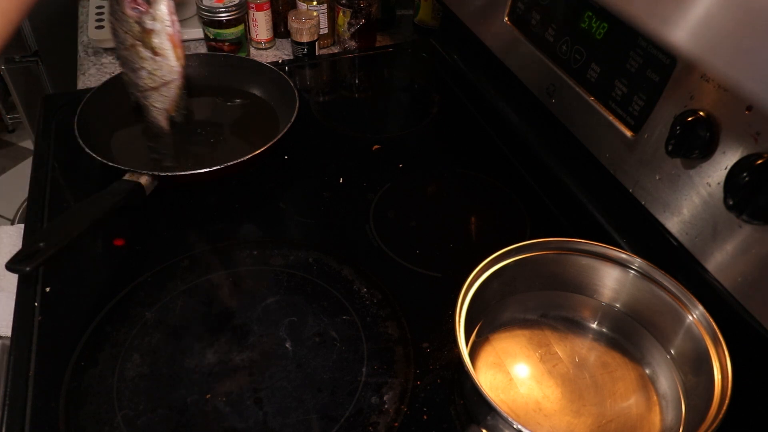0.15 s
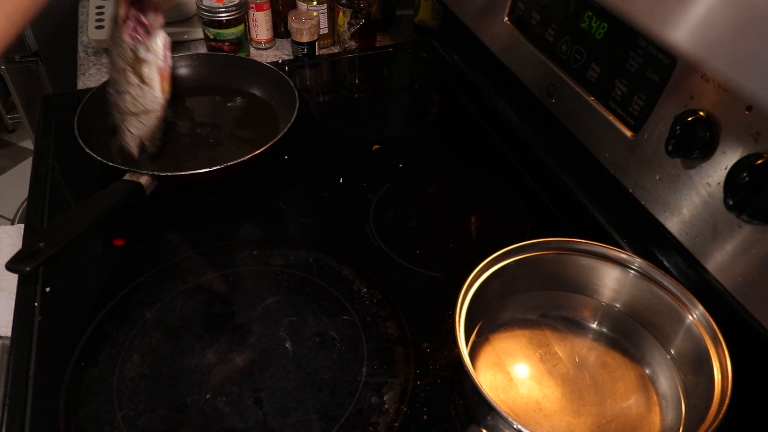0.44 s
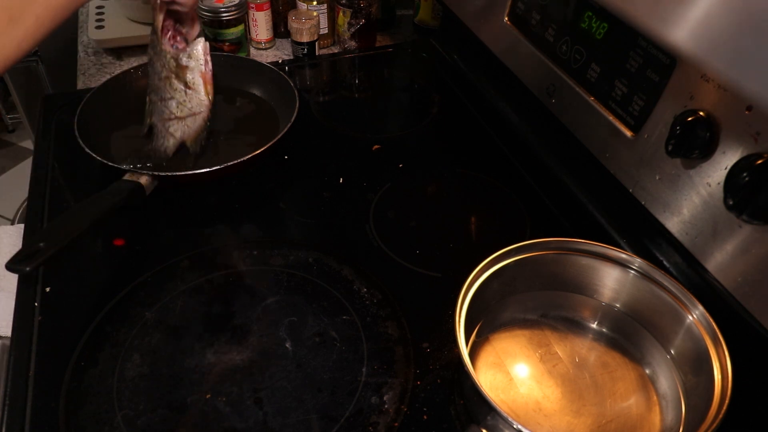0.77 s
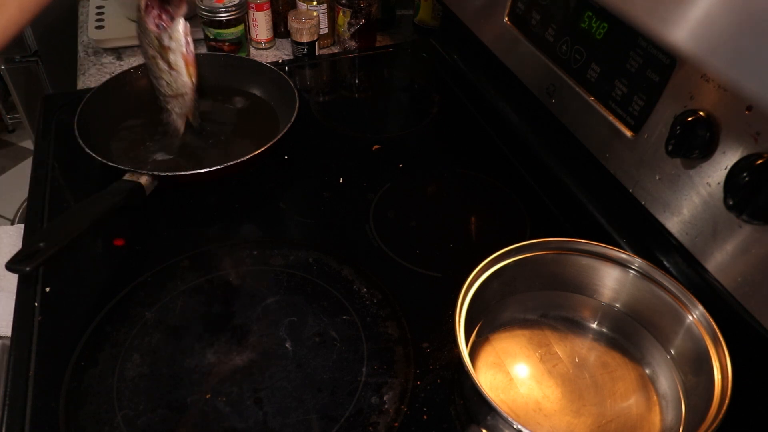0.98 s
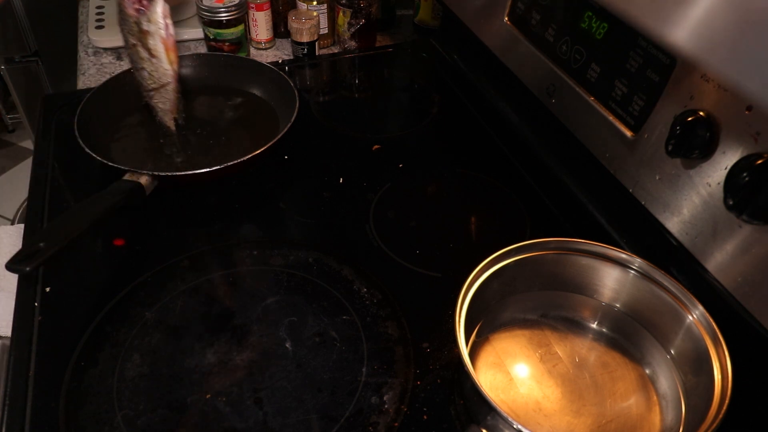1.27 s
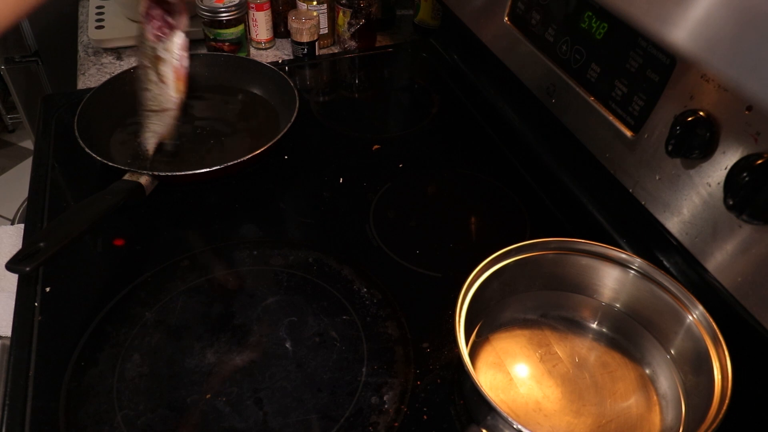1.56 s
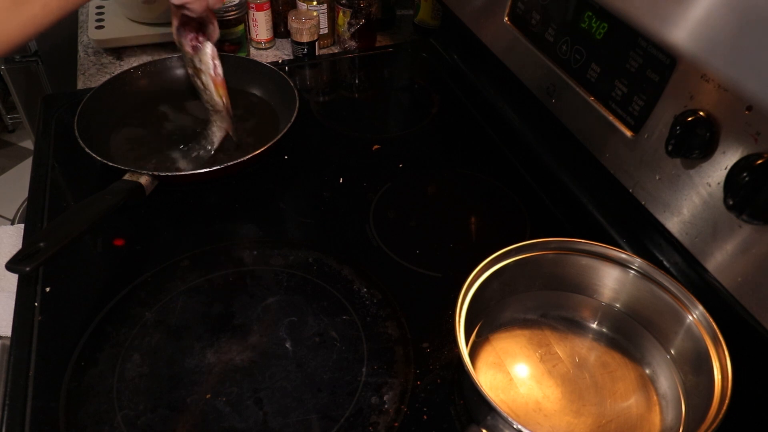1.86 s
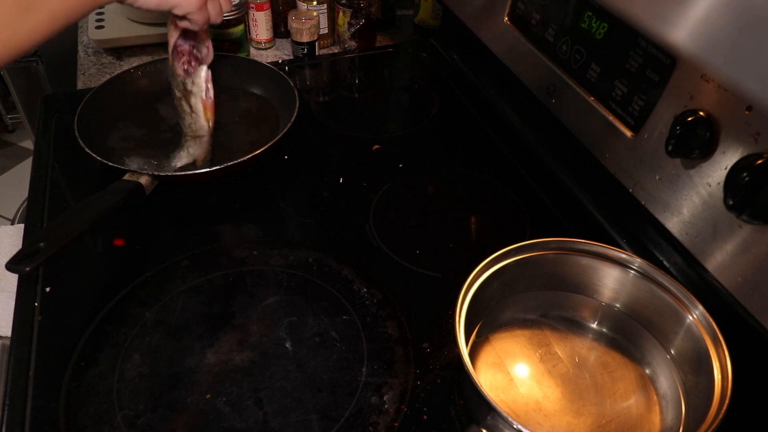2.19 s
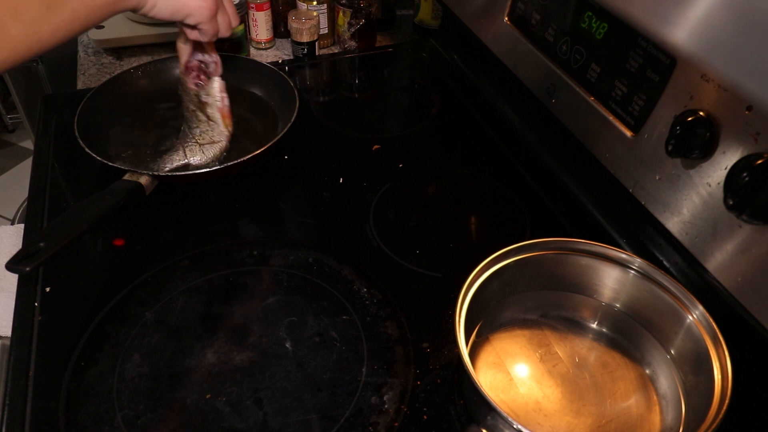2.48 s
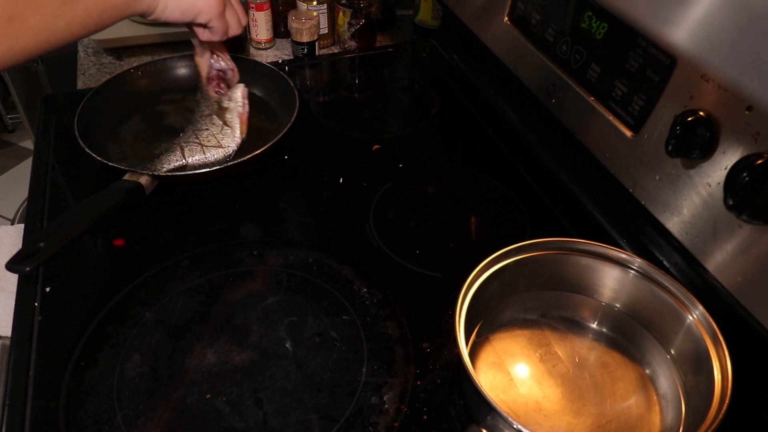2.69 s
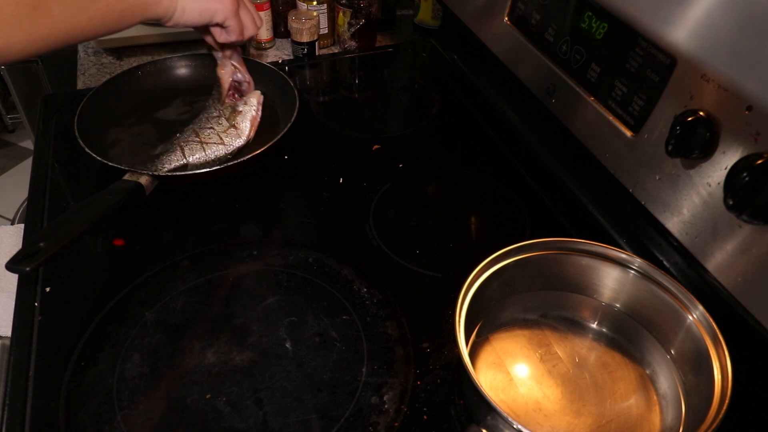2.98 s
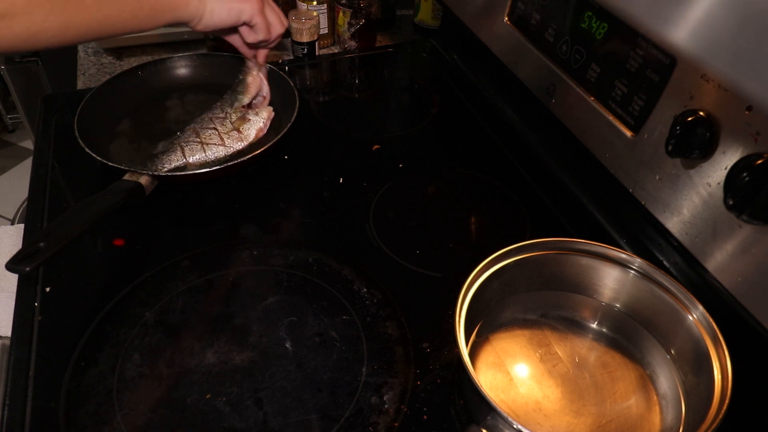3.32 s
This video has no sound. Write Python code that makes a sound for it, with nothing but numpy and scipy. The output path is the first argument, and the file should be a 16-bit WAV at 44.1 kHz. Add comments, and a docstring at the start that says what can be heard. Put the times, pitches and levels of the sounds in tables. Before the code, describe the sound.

Hot oil sizzles in short, popping bursts as a wet fish's tail touches a frying pan, with a thin squeal of steam. The sizzle then turns louder and steady, crackling and gurgling close by in a small kitchen.

```python
"""Wet fish into hot oil

A wet fish is dipped tail first into a pan of hot oil, lifted clear, then lowered in. Water flashes
to steam: a sizzle of tiny bursts, single loud pops, a thin squeal and a gurgle of larger bubbles.
The pan and the hob scatter the bursts into a small kitchen; the stove starts to hum."""
import sys
import numpy as np
from scipy import signal
from scipy.io import wavfile

SR = 44100
rng = np.random.default_rng(int(sys.argv[2]) if len(sys.argv) > 2 else 0)


def transcribe(u):
    """Save the signal u as a 16-bit wav file named by the first command-line argument.

    u: samples, shape (n,) or (channels, n), limited to [-1, 1]; the rate is SR.
    q: integer samples, one column per channel.
    """
    v = np.clip(np.atleast_2d(u).T, -1, 1)
    q = np.round(v * 32767).astype(np.int16)
    wavfile.write(sys.argv[1], SR, q)


N = 152145
TIME = np.arange(N) / SR
CUTOFF_HZ = 15900
EDGES_HZ = 16500 / 2 ** np.arange(9.5, -.1, -.5)
BANDS_HZ = np.sqrt(EDGES_HZ[1:] * EDGES_HZ[:-1])  # half an octave apart

# Sizzle envelope in five registers: time_s, low_db, low_mid_db, high_mid_db, treble_db, top_db
SIZZLE_LEVELS = [(0.0, -61, -45, -45, -50, -50.5), (0.12, -62, -65, -50, -46, -48),
                 (0.24, -72, -66.0, -55, -57, -51.5), (0.32, -67, -74, -71, -52, -61),
                 (0.47, -72, -80, -69, -58.5, -56.5), (0.55, -58, -58, -41, -45.5, -54),
                 (0.72, -53, -51, -41, -42.5, -46), (0.9, -63, -48, -37.5, -53.5, -48),
                 (1.06, -60, -53, -42.5, -43, -59), (1.17, -60.5, -38.5, -42.5, -41.5, -52),
                 (1.29, -61, -64, -48.5, -44.5, -54), (1.44, -65, -73, -53.5, -56.5, -67),
                 (1.58, -68, -78, -58, -59, -61), (1.74, -54, -44.5, -47.0, -54, -56),
                 (1.86, -59, -58, -41, -44.5, -55), (1.98, -46.5, -33.5, -37.5, -39.0, -51),
                 (2.22, -44.5, -43.5, -33.0, -37.0, -50.5), (2.42, -52, -40, -38, -39.5, -46),
                 (2.6, -49, -31.5, -37.5, -39.5, -44.5), (3.45, -44.5, -39, -38.5, -39.0, -49.0)]


def from_db(db):
    """Decibels to gain."""
    return 10 ** (np.asarray(db) / 20)


def unit_rms(x):
    """Scale to unit rms."""
    return x / np.sqrt(np.mean(x ** 2) + 1e-20)


def decay(t, t60_s):
    """An envelope that falls 60 dB in t60_s."""
    return np.exp(-np.log(1000) * t / t60_s)


def in_time(rows):
    """Breakpoints to one curve per column, sample by sample."""
    time_s, *columns = np.transpose(rows)
    return np.array([np.interp(TIME, time_s, column) for column in columns])


def at_hz(spectrum, hz):
    """Read a spectrum on a log-frequency axis."""
    points_hz, db = np.transpose(spectrum)
    return np.interp(np.log(hz), np.log(points_hz), db)


def band(x, hz, octaves):
    """Band-pass around a pitch; a click rings in it for a few cycles."""
    edges = np.minimum(hz * 2 ** (np.array([-.5, .5]) * octaves), [.44 * SR, .48 * SR])
    return signal.sosfilt(signal.butter(2, edges, "band", fs=SR, output="sos"), x + 1e-18)


def clicks(per_s, spread_db):
    """Random clicks, many small and a few large."""
    sizes = from_db(spread_db * np.minimum(rng.exponential(1, N), 4.5))
    return (rng.random(N) < per_s / SR) * sizes * rng.choice([-1, 1], N)


def scatter(x, t60_s=.034, spray_db=7):
    """Each click trails a quick spray of reflections around the pan, different for every spot."""
    feedback = from_db(-120 / (t60_s * SR))
    energy = signal.lfilter([1 - feedback], [1, -feedback], x ** 2 + 1e-30)
    return x + from_db(spray_db) * np.sqrt(energy) * rng.standard_normal(len(x))


def bubbles(births, pitch_hz, cycles):
    """Each click sets off a damped sine that falls 60 dB over the given cycles."""
    out, t = np.zeros(N + SR), TIME[:SR // 20]
    for i in np.flatnonzero(births):
        hz = pitch_hz[i]
        ring = np.sin(2 * np.pi * hz * t) * decay(t, cycles / hz)
        out[i:i + len(t)] += births[i] * np.sqrt(hz) * ring
    return unit_rms(out[:N])


def sizzle(hiss_db=-2.5, burst_octaves=.54):
    """Tiny steam bursts, each at a pitch of its own, over a hiss of countless smaller ones."""
    # Centres of the five registers: pitch_hz
    registers = [900, 1850, 3600, 6900, 12300]
    # Tone colour of the sizzle: pitch_hz, gain_db
    colour = [(200, -57), (360, -10.5), (520, -16.5), (750, -4.5), (1150, -4.5), (1700, -7), (2900, -2),
              (4000, -8.5), (6000, -1.5), (8700, -2), (10800, -21), (14000, -5)]
    levels_db = in_time(SIZZLE_LEVELS)
    bursts = clicks(per_s=1500, spread_db=4.4)
    burst_pitch = rng.uniform(np.log2(150), np.log2(30000), N)
    out = np.zeros(N)
    for hz in BANDS_HZ[6:]:
        in_band = np.exp(-.5 * ((burst_pitch - np.log2(hz)) / burst_octaves) ** 2)
        grains = unit_rms(scatter(bursts * in_band))
        hiss = from_db(hiss_db) * rng.standard_normal(N)
        crossfade = [np.interp(np.log(hz), np.log(registers), row) for row in np.eye(len(registers))]
        gain = from_db(crossfade @ levels_db + at_hz(colour, hz))
        out += gain * unit_rms(band(grains + hiss, hz, octaves=.73))
    return out


def spits():
    """Sparse, bright ticks of oil spray ride the top of the sizzle."""
    top_db = in_time(SIZZLE_LEVELS)[-1]
    spray = scatter(clicks(per_s=260, spread_db=4.5))
    return from_db(top_db - 2) * unit_rms(band(spray, hz=10600, octaves=.93))


def blips(centre_hz=3870, spread_octaves=.65):
    """Small bubbles ring briefly at scattered pitches, swelling with the sizzle's high mids."""
    high_mid_db = in_time(SIZZLE_LEVELS)[2]
    hz = np.minimum(centre_hz * 2 ** (spread_octaves * rng.standard_normal(N)), CUTOFF_HZ)
    return from_db(high_mid_db - 3) * bubbles(clicks(per_s=380, spread_db=4), hz, cycles=80)


def room_tone():
    """Quiet kitchen air: a steady bed of noise."""
    # Spectrum of the air: pitch_hz, band_level_db
    air = [(25, -90), (65, -75), (100, -78), (550, -68.5), (1600, -80), (15000, -68.5)]
    return sum(from_db(at_hz(air, hz)) * unit_rms(band(rng.standard_normal(N), hz, octaves=.35))
               for hz in BANDS_HZ)


def pan_ring():
    """The pan's modes dying away after one tap, with unit energy."""
    # Modes of the pan: pitch_hz
    modes = [620, 1061, 1181, 1490, 2420, 2880, 3620, 5690]
    t = TIME[:SR // 2]
    ring = sum(np.cos(2 * np.pi * hz * t) for hz in modes) * decay(t, t60_s=.073)
    return ring / np.linalg.norm(ring)


def kitchen(x, pan_db=-23.5, room_db=-9, onset_s=.0084):
    """Direct sound, the faint ring of the pan and the small room's tail."""
    t = TIME[:SR // 2]
    tail = rng.standard_normal(len(t)) * decay(t, t60_s=.26) * (1 - np.exp(-t / onset_s))
    tail /= np.linalg.norm(tail)
    response = signal.unit_impulse(len(t)) + from_db(pan_db) * pan_ring() + from_db(room_db) * tail
    return signal.fftconvolve(x, response / np.linalg.norm(response))[:N]


def pops(snap_db=-20, splat_hz=456, pan_db=-20.5):
    """Water drops explode and set the pan ringing: a short note, a faint snap and a wet splat."""
    # Exploding drops: start_s, level_db, pitch_hz, width_octaves
    drops = [(0.0765, -38.5, 3700, 1.7), (0.0939, -37, 3760, 1.85), (0.1385, -34, 7300, 0.9),
             (0.5188, -39, 8600, 0.36), (0.5785, -35, 2640, 1.1), (0.6352, -33.5, 3050, 2),
             (0.6683, -33.5, 3240, 1.4), (0.7427, -32, 2300, 2.55), (0.7621, -34, 3500, 1.3),
             (0.8085, -36.5, 1720, 2), (0.8525, -31, 1570, 2), (0.8973, -33.5, 3350, 0.55),
             (1.09, -30, 3170, 0.25), (1.198, -24.5, 4450, 1.07), (1.3466, -28, 2690, 0.35),
             (1.347, -32.5, 3670, 0.17), (1.3478, -27, 6500, 0.42), (1.6279, -34, 2700, 0.58),
             (1.6848, -32, 1880, 1.96), (1.7757, -34, 3700, 1.05), (1.8326, -40, 2650, 0.47),
             (1.9039, -30, 2820, 0.9), (1.9225, -27, 2220, 0.67), (1.9511, -29, 1790, 2.3),
             (1.9616, -25, 2080, 1.07), (2.0028, -27.5, 2640, 2.3), (2.0308, -26.5, 1670, 2.1),
             (2.099, -24, 2200, 2.9), (2.1107, -28, 1750, 1.5), (2.209, -28, 960, 0.62),
             (2.2283, -26.5, 2870, 1.55), (2.2585, -23.5, 4000, 0.46), (2.2947, -29.5, 2380, 0.4),
             (2.355, -34, 2940, 0.64), (2.424, -33.5, 3000, 0.62), (2.5809, -27.5, 2500, 0.9),
             (2.6268, -28, 4050, 0.81), (2.6722, -23, 2370, 2.1), (2.817, -24.5, 4800, 0.73),
             (2.942, -36.5, 2880, 0.31), (2.9872, -20.5, 1560, 1.2), (3.0938, -26, 5000, 0.82),
             (3.19, -27.5, 3200, 0.51), (3.3388, -19, 1910, 0.85), (3.3555, -23.5, 2000, 0.93)]
    snap_filter = signal.butter(1, [splat_hz, 9950], "band", fs=SR, output="sos")
    out = np.zeros(N + SR)
    for start_s, level_db, hz, octaves in drops:
        click = scatter(signal.unit_impulse(SR // 20))
        note = unit_rms(band(click, hz, octaves))
        snap = from_db(snap_db) * unit_rms(signal.sosfilt(snap_filter, click))
        octaves_above_splat = np.log2(hz / splat_hz) - octaves / 2
        splat_db = -7.5 - 13.5 * octaves_above_splat  # deep, wide pops are the wettest
        splat = from_db(splat_db) * unit_rms(band(click, splat_hz, octaves=.65))
        gain = from_db(level_db) * np.sqrt(.009 * SR / len(click))  # the energy of 9 ms at level_db
        start = int(start_s * SR)
        out[start:start + len(click)] += gain * (note + snap + splat)
    return out[:N] + from_db(pan_db) * signal.fftconvolve(out, pan_ring())[:N]


def squeal():
    """Steam squeezes out from under the tail in a sputtering jet that sinks in pitch."""
    # Glide of the jet: time_s, level_db, pitch_hz
    jet = [(.12, -78, 8930), (.16, -47, 8860), (.25, -43, 6330), (.31, -53, 6230), (.46, -54, 5900),
           (.49, -55, 3225), (.6, -71, 2418)]
    level_db, hz = in_time(jet)
    sputter = scatter(clicks(per_s=200, spread_db=3))
    whistle = signal.hilbert(band(sputter, hz.max(), octaves=.3))
    shift_down = np.exp(2j * np.pi * np.cumsum(hz - hz.max()) / SR)
    return from_db(level_db) * unit_rms(np.real(whistle * shift_down))


def gurgle(spread_octaves=.19, low_cut_hz=500):
    """Larger bubbles ring deeper as more of the fish sinks in."""
    # Bubbling under the fish: time_s, level_db, pitch_hz
    bubbling = [(.5, -88, 2900), (.58, -43, 2290), (.78, -54.5, 1310), (.87, -47, 1130),
                (1.01, -42.5, 1205), (1.25, -88, 2000), (1.87, -66, 2330), (1.96, -49, 1760),
                (2.11, -33.5, 1120), (2.21, -35.5, 1000), (2.32, -43.5, 880), (2.55, -48.5, 1450),
                (3.32, -42, 1480), (3.35, -31, 1560), (3.45, -32, 1400)]
    level_db, centre_hz = in_time(bubbling)
    hz = centre_hz * 2 ** (spread_octaves * rng.standard_normal(N))
    rings = bubbles(clicks(per_s=360, spread_db=3), hz, cycles=33)
    low_cut = signal.butter(2, low_cut_hz, "high", fs=SR, output="sos")
    return from_db(level_db) * signal.sosfilt(low_cut, rings)


def stove_hum(start_s=1.99, rise_s=.05, pitch_hz=120.6, level_db=-60.5):
    """Mains hum fades in as the stove switches on."""
    fade_in = np.clip((TIME - start_s) / rise_s, 0, 1)
    return from_db(level_db) * fade_in * np.sin(2 * np.pi * pitch_hz * TIME)


def hollow(x, peak_s=2.28, half_length_s=.14, notch_hz=1570):
    """As the tail folds onto the oil, a notch opens above the gurgle and briefly hollows the sizzle."""
    notched = signal.lfilter(*signal.iirnotch(notch_hz, Q=3.9, fs=SR), x)
    depth = np.exp(-((TIME - peak_s) / half_length_s) ** 2)
    return x + depth * (notched - x)


def scene():
    """The frying pan in the kitchen, over room tone and hum, in mono."""
    frying = hollow(sizzle() + spits() + blips() + pops() + gurgle())
    return (kitchen(frying + squeal()) + room_tone() + stove_hum())[None]


def record(dry):
    """A steep low-pass trims the very top."""
    return signal.sosfilt(signal.ellip(14, .2, 80, CUTOFF_HZ, fs=SR, output="sos"), dry)


dry = scene()
out = record(dry)
transcribe(out)
```